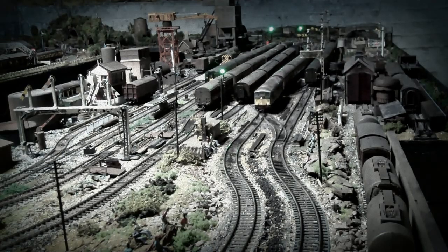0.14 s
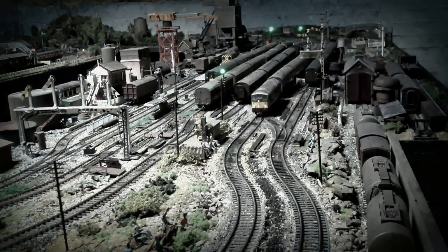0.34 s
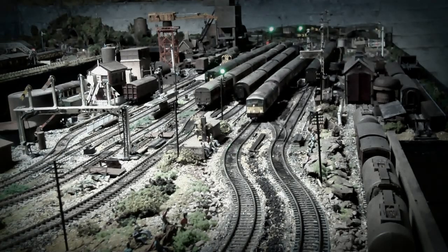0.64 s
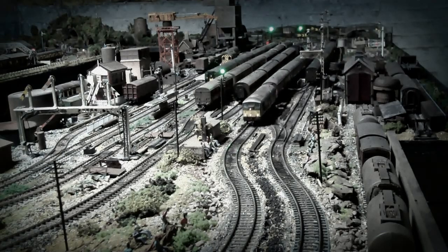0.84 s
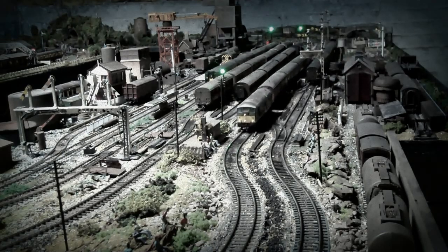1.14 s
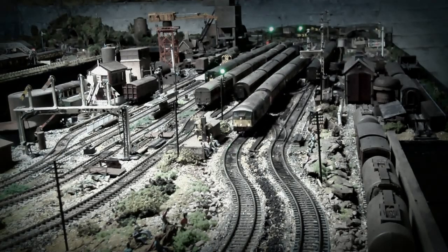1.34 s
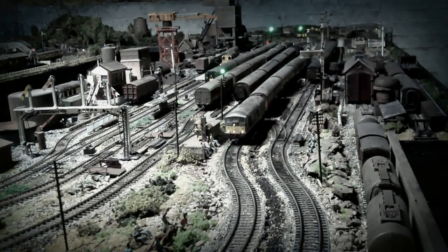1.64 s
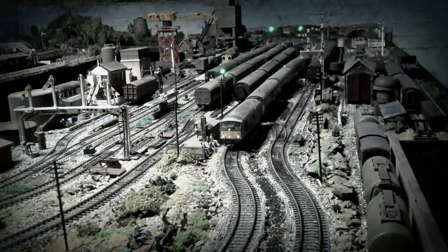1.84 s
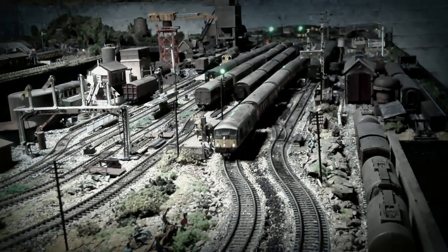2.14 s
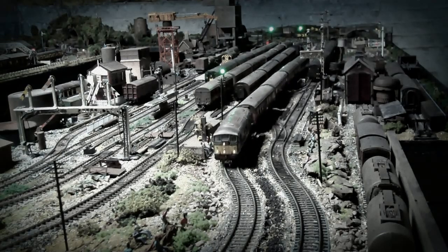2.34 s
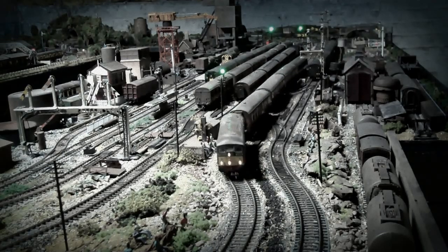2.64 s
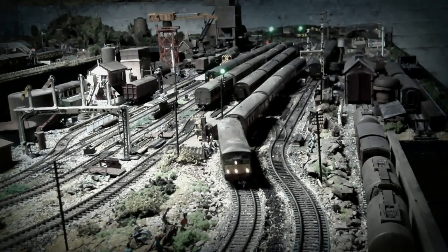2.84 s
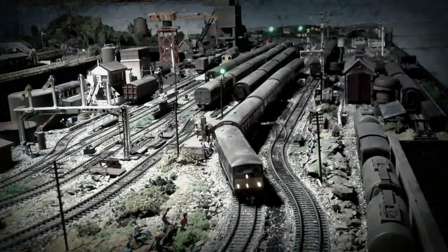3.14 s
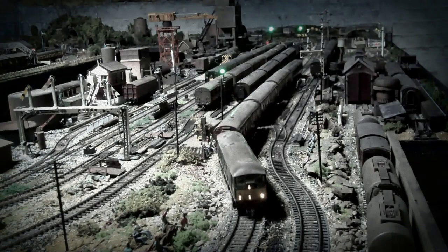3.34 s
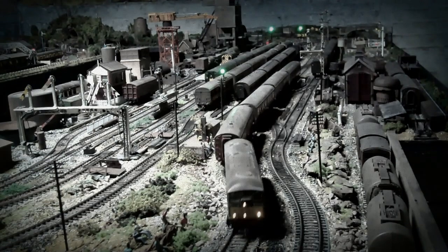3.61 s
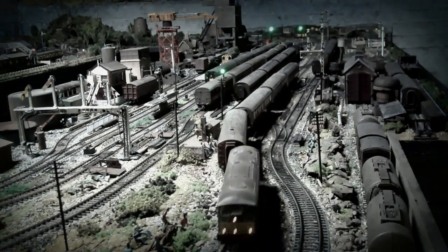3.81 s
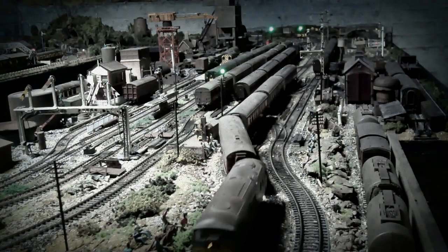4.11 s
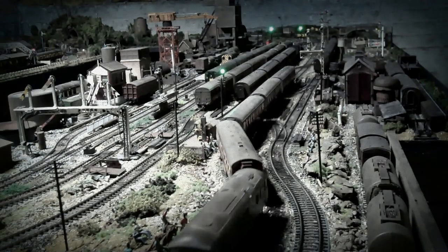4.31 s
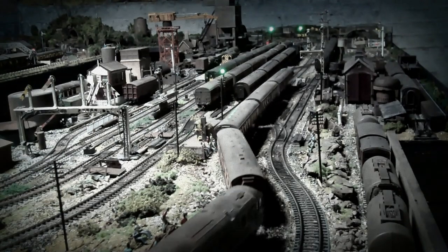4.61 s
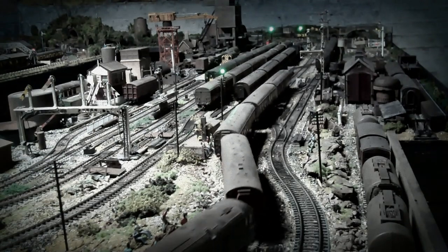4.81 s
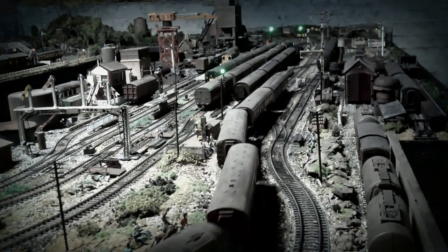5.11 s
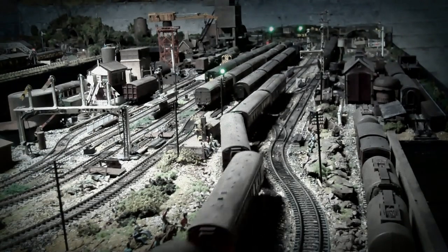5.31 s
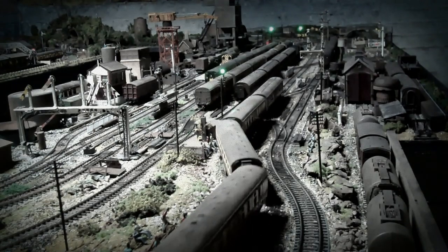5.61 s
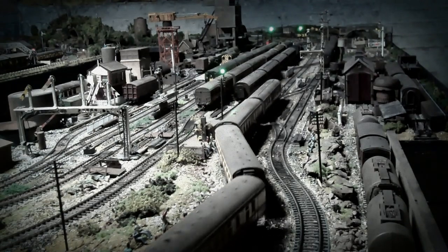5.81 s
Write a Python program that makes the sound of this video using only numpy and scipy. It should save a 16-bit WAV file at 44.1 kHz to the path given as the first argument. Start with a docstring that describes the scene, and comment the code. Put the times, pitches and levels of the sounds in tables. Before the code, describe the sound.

Bright plastic clatter of a miniature locomotive and coaches builds fast, passes close with a thin gear whine, and rattles on in a small room.

```python
"""On a model railway layout in a small room, a locomotive hauls coaches over points and an S-bend, up to and past the ear.
The drive rattles six times a wheel turn, about 25 a second: noise flurries ring the plastic shell and the bogies.
Some rattles jolt, adding a hard tick, a knock and a clink. Coloured noise makes the wheels hiss, scrape and drum;
flanges squeak as brief tones, and in the tight curve the gears whine in harmonics. Faint hum lies behind."""
import sys
import numpy as np
from scipy import signal
from scipy.fft import rfft, irfft, next_fast_len
from scipy.io import wavfile
from scipy.ndimage import map_coordinates

SR = 44100
rng = np.random.default_rng(int(sys.argv[2]) if len(sys.argv) > 2 else 0)


def transcribe(u):
    """Save the signal u as a 16-bit wav file named by the first command-line argument.

    u: samples, shape (n,) or (channels, n), limited to [-1, 1]; the rate is SR.
    q: integer samples, one column per channel.
    """
    v = np.clip(np.atleast_2d(u).T, -1, 1)
    q = np.round(v * 32767).astype(np.int16)
    wavfile.write(sys.argv[1], SR, q)


N = 262836

# Train's place. Each row: time in seconds, place (0 head-on, 1 passing, 2 gone by).
PASSING = [(0, 0.085), (1.2, 0.26), (2, 0.17), (2.8, 0.22), (3.5, 0.57), (4.3, 0.88), (4.9, 1.12),
           (5.3, 1.13), (5.55, 1.72), (5.96, 1.65)]
# Driving wheels. Each row: time in seconds, speed in turns per second.
SPEED = [(0, 2.7486), (1.2, 3.6216), (2.2, 4.0748), (3.2, 4.1801), (3.9, 4.3076), (4.5, 4.1395),
         (5.3, 4.3084), (5.96, 4.1074)]
# Force of the drive's rattle. Each row: time in seconds, level in dB, brightness (bogies over shell) in dB.
EFFORT = [(0, -41.5, 7), (.36, -29, -1.5), (.56, -23, 0.5), (.95, -20, -1), (1.4, -19, 0.5),
          (2.2, -20, -1.5), (3, -21.5, -3), (3.6, -19, -5), (4.5, -21.5, -3), (5.25, -21, 2),
          (5.96, -24, 1)]
# Shell modes. Each row: frequency in Hz, width in Hz before squaring, relative dB head-on, passing, gone by.
SHELL = [(1039, 264, -23.5, -9.5, -9), (1535, 760, -12, -16, -16), (1949, 163, -3.5, 5.5, -12.5),
         (2104, 133, -4.5, -9, -11), (2387, 273, -6.5, -8, -8.5), (3176, 370, -1, -15.5, -24),
         (3385, 320, -29, -8.5, -2.5)]
# Hard rattles. Each row: onset in seconds, bogie reference in dB, knock in Hz, knock reference in dB.
JOLTS = [(0.6, -19, 2300, -23), (0.704, -16, 2370, -21), (0.7517, -9, 1980, -19),
         (0.851, -14.5, 1950, -16.5), (0.9514, -14.5, 2370, -16), (1.0415, -8, 1960, -17),
         (1.229, -11.5, 2000, -25), (1.3184, -8, 1910, -16), (1.4087, -14.5, 1900, -15),
         (1.499, -9.5, 1950, -22), (1.587, -10.5, 1870, -18.5), (1.674, -14.5, 1890, -17),
         (1.76, -12.5, 2060, -19.5), (1.8472, -8, 2120, -16.5), (1.932, -13.5, 1950, -17),
         (2.097, -8, 2580, -19), (2.18, -13, 1860, -19.5), (2.229, -12.5, 2070, -19.5),
         (2.264, -13.5, 2000, -21), (2.3437, -10, 2200, -18.5), (2.47, -15, 2000, -21),
         (2.5884, -11, 1960, -19), (2.752, -13.5, 1900, -20.5), (2.828, -10, 1860, -18),
         (2.9124, -14.5, 2090, -17), (2.9553, -17, 2080, -16.5), (3.0694, -14.5, 1970, -14),
         (3.309, -14, 1960, -16), (3.3914, -16, 1940, -15.5), (3.47, -22, 1920, -19),
         (3.5497, -16.5, 1940, -17), (3.866, -14, 1950, -19.5), (4.014, -15, 1930, -17),
         (4.177, -15.5, 1930, -16), (4.332, -13.5, 1950, -16), (4.377, -18, 1930, -17),
         (4.566, -13, 1890, -15.5), (4.612, -14.5, 1920, -14), (4.648, -18.5, 1930, -21),
         (4.7234, -16, 1960, -17), (4.806, -14, 1950, -16), (4.854, -13, 1940, -19),
         (4.887, -11.5, 1950, -27), (5.046, -11.5, 1950, -17.5), (5.125, -13, 1940, -21),
         (5.165, -13.5, 1950, -16), (5.2797, -11.5, 1920, -16.5), (5.326, -10.5, 1920, -16.5),
         (5.433, -8, 1950, -19.5), (5.559, -10.5, 2400, -20.5), (5.672, -10, 2400, -22.5)]
JOLT_PEAK_S = 0.004  # from onset to tick


def amp(db):
    """Decibels to gain."""
    return 10 ** (np.asarray(db) / 20)


def unit(x):
    """Scale to rms 1."""
    return x / np.sqrt(np.mean(x ** 2) + 1e-20)


def along(points, hz):
    """Interpolate (Hz, value) points on a log frequency axis."""
    f, v = np.transpose(points)
    return np.interp(np.log(hz + 1), np.log(f + 1), v)


def curves(rows):
    """One value per sample for each column after the time."""
    s, *cols = np.transpose(rows)
    return [np.interp(np.arange(N) / SR, s, c) for c in cols]


def by_place(levels_db):
    """A level in dB that follows the train from head-on over passing to gone by."""
    return np.interp(curves(PASSING)[0], np.arange(3), levels_db)


def wobble(knots_per_s):
    """A smooth random curve through normal draws."""
    knots = rng.standard_normal(int(N * knots_per_s / SR) + 4)
    return map_coordinates(knots, [np.arange(N) * knots_per_s / SR])


def filtered(x, response):
    """Filter x by a complex response of frequency."""
    m = next_fast_len(N + SR // 2)
    return irfft(rfft(x, m) * response(np.fft.rfftfreq(m, 1 / SR)), m)[..., :N]


def resonance(f, hz, width_hz):
    """Complex response of one damped mode, 1 at its peak."""
    return 1j * f * width_hz / (hz * hz - f * f + 1j * f * width_hz)


def spread(x):
    """Mix two unrelated signals into a stereo pair whose likeness depends on frequency."""
    # Each row: frequency in Hz, left-right correlation.
    alike = [(40, 0.48), (160, 0.91), (700, 0.91), (2000, 0.88), (3200, 0.72), (5300, 0.38), (8800, 0.29),
             (14000, 0)]

    def mid_side(hz):
        angle = np.arccos(np.clip(along(alike, hz), -1, 1)) / 2
        return np.array([np.cos(angle), np.sin(angle)])

    mid, side = filtered(x, mid_side)
    return np.array([mid + side, mid - side])


def contacts(spiky_db):
    """Stereo noise of tiny impacts, uneven in size from one 16-sample step to the next, rms 1."""
    step_db = spiky_db * rng.standard_normal(N // 16 + 1)
    sizes = amp(np.repeat(step_db, 16)[:N])
    return unit(spread(sizes * rng.standard_normal((2, N))))


def rush(spectrum, spiky_db):
    """Dense contacts with a broad colour, rms 1."""
    return unit(filtered(contacts(spiky_db), lambda hz: amp(along(spectrum, hz))))


def ring(force, modes, vary_db, wander):
    """Modes ring at constant overall power; balance follows place, balance and pitch also drift at random."""
    m = next_fast_len(N + SR // 8)
    f, spectrum = np.fft.rfftfreq(m, 1 / SR), rfft(force, m)
    sound, power = 0, 0
    for hz, width_hz, *views_db in modes:
        response = resonance(f, hz, width_hz) ** 2
        gain = amp(by_place(views_db) + vary_db * wobble(25))
        drift = np.exp(2j * np.pi * np.cumsum(hz * wander * wobble(25)) / SR)
        # one-sided spectrum gives a complex signal whose pitch can be shifted
        analytic = np.fft.ifft(spectrum * response, m)[:, :N]
        sound = sound + 2 * gain * (analytic * drift).real
        power = power + gain ** 2 * np.mean(np.abs(response) ** 2)
    return sound / np.sqrt(power)


def flurries(times_s, levels_db, rises_s, fall_s, early_s):
    """Force envelope: each flurry swells exponentially, peaks early_s before its time and dies away."""
    power = np.zeros(N)
    for s, db, rise_s in zip(times_s, levels_db, rises_s):
        span = np.arange(max(0, int(s * SR) - SR // 16), min(N, int(s * SR) + SR // 10))
        t = span / SR - s + early_s
        swell = np.exp(np.minimum(t / rise_s, -t / fall_s))
        power[span] += (amp(db) * swell) ** 2
    return np.sqrt(power)


def rattles():
    """Time, shell dB, bogie dB and rise of each rattle: one pattern per wheel turn, with some set as jolts."""
    # Each row: share of the turn, dB head-on, dB passing, brightness in dB, rise in seconds at mean speed.
    pattern = [(0, -0.5, -2, 4, 0.005), (.19, -4, -3, 1.5, 0.0057), (0.343, -1, 0.5, 2.5, 0.0068),
               (0.528, -2, -2, 1, 0.0054), (.682, -3, -1.5, 2.5, 0.0034), (0.857, -5.5, -2, 2.5, 0.0078)]
    first_turn_s, rise_speed_power, uneven_db = 0.099, 2.2, 0.6
    t = np.arange(N) / SR
    speed = curves(SPEED)[0]
    softness = (speed.mean() / speed) ** rise_speed_power  # slow wheels swell more gently
    turns = np.cumsum(speed) / SR
    turns -= np.interp(first_turn_s, t, turns)
    effort_db, bright_db = curves(EFFORT)
    place = curves(PASSING)[0]
    rows = []
    for share, head_on_db, passing_db, bright, rise_s in pattern:
        for i in np.searchsorted(turns, np.arange(share, turns[-1])):
            db = effort_db[i] + np.interp(place[i], [0, 1], [head_on_db, passing_db])
            rows.append((t[i], db, bright_db[i] + bright, rise_s * softness[i]))
    times_s, db, bright, rises_s = np.transpose(sorted(rows))
    shell_db = db + uneven_db * rng.standard_normal(len(times_s))
    bogie_db = shell_db + bright
    for s, clash_db, _, knock_db in JOLTS:
        k = np.argmin(np.abs(times_s - s))
        times_s[k], rises_s[k] = s + JOLT_PEAK_S, 0.0028
        shell_db[k], bogie_db[k] = knock_db - 4, clash_db - 6.5
    return times_s, shell_db, bogie_db, rises_s


def drive():
    """Slack taken up in the drive shakes bogies and shell with flurries of impacts; a jolt adds one hard tick."""
    # Bogie frame modes. Each row: frequency in Hz, width in Hz before squaring, relative dB head-on, passing, gone by.
    bogie = [(4619, 600, -12, -5, -2), (5045, 240, -6.5, -15, -27), (5650, 450, -2, -9.5, -22),
             (6683, 460, -4, -11.5, -17.5), (7390, 720, -21, -17, -16.5), (8610, 1730, -20, -26.5, -19)]
    times_s, shell_db, bogie_db, rises_s = rattles()
    jolt_s, jolt_db = np.transpose(JOLTS)[:2]
    tick_rises_s = np.full(len(JOLTS), 0.0005)
    ticks = flurries(jolt_s + JOLT_PEAK_S, jolt_db, tick_rises_s, fall_s=0.0016, early_s=0)
    ticks = amp(by_place((-2.5, -5.5, -7))) * ticks * contacts(spiky_db=-0.5)
    shell_force = flurries(times_s, shell_db, rises_s, fall_s=0.016, early_s=0.0026) * contacts(spiky_db=2.0)
    shell_force = shell_force + amp(-6.5) * ticks
    bogie_force = flurries(times_s, bogie_db, rises_s, fall_s=0.0105, early_s=0.0029) * contacts(spiky_db=2.5)
    bogie_force = bogie_force + ticks
    shell_sound = ring(shell_force, SHELL, vary_db=2.1, wander=0.012)
    return shell_sound + ring(bogie_force, bogie, vary_db=1.5, wander=0.008)


def rails():
    """Narrow track resonances kept ringing by the rolling wheels, rms 1."""
    # Each row: frequency in Hz, width in Hz, relative level in dB, all before the magnitude is squared.
    modes = [(4180, 56, -2.5), (5185, 200, -4.5), (6093, 140, -4), (7280, 150, -6.5)]

    def response(f):
        total = sum(amp(db) * resonance(f, hz, width_hz) for hz, width_hz, db in modes)
        return total * np.abs(total)

    return unit(filtered(contacts(spiky_db=3.5), response))


def scenery(x, echo_db, reach_s=0.024, count=12):
    """Model buildings and the backdrop throw back weak early copies that comb the spectrum."""
    taps = np.zeros(SR // 16)
    delays = np.minimum((rng.uniform(0.15, 1, count) * reach_s * SR).astype(int), len(taps) - 1)
    taps[delays] = amp(echo_db) / np.sqrt(count) * rng.choice([-1, 1], count)
    taps[0] = 1
    return signal.fftconvolve(x, taps[None] / np.linalg.norm(taps), axes=1)[:, :N]


def wheels():
    """Rolling drums the baseboard, buzzes the shell, hisses and scrapes; a fine fizz is strongest once gone by."""
    # Noise colours. Each row: frequency in Hz, relative level in dB per Hz.
    board_colour = [(25, -42), (45, -48), (115, -21), (200, -22), (290, -19), (400, -17), (500, -11.5),
                    (660, -9), (800, 0), (1020, 0.5), (1180, -1), (1400, 1.5), (1750, -2), (2450, -7),
                    (2800, -9.5), (4000, -25)]
    boom_colour = [(60, -40), (100, -3), (135, -20), (170, 6.5), (215, 4), (260, -1.5), (500, -23)]
    hiss_colour = [(1500, -21), (2750, -8.5), (3300, 0), (3850, -8), (4400, -1), (5050, 6), (5450, -0.5),
                   (6050, 0.5), (6900, -8), (8300, -14), (9800, -17.5), (11000, -29), (11800, -55),
                   (14400, -46)]
    scrape_colour = [(900, -33), (1500, -28), (2000, -22), (2330, 3), (2750, -20), (3250, -4.5), (3800, -1),
                     (4400, 3), (5200, 4.5), (6500, -4), (8000, -22), (11500, -56)]
    fizz_colour = [(7000, -12), (9000, 2), (11000, -4), (12000, -1), (13700, 8), (14400, -14)]
    # Table boom as the train's weight comes onto it. Each row: time in seconds, level in dB.
    weight = [(0, -74), (1, -66), (2, -57.5), (4.1, -54), (5.96, -59)]
    # Scraping through the points. Each row: time in seconds, level in dB before a -2.2 dB trim.
    points = [(0, -27), (.4, -23.5), (.82, -26.5), (1.0, -20.5), (1.2, -21), (1.4, -26), (2.2, -61)]
    bumps = wobble(30)
    speed = curves(SPEED)[0]
    speed_db = 1.0 * (speed - speed.mean())  # 1 dB per turn per second
    board_db = by_place((-32.5, -30, -31.5)) + speed_db + 0.24 * bumps
    board = amp(board_db) * rush(board_colour, spiky_db=0.5)
    boom = amp(curves(weight)[0] + 0.67 * wobble(16)) * rush(boom_colour, spiky_db=-1.0)
    buzz_db = curves(EFFORT)[0] - 12.5 + 1.3 * wobble(60)
    buzz = ring(amp(buzz_db) * contacts(spiky_db=3.0), SHELL, vary_db=2.5, wander=0.014)
    hiss = rush(hiss_colour, spiky_db=1.0) + amp(-8.0) * rails()
    hiss = amp(by_place((-31, -29, -29)) + 1.1 * bumps) * hiss
    scrape = amp(curves(points)[0] - 2.2 + 1.2 * wobble(39.3)) * rush(scrape_colour, spiky_db=4.0)
    fizz = amp(by_place((-65, -46, -40)) + 1.2 * bumps) * rush(fizz_colour, spiky_db=7.0)
    return boom + scenery(board, echo_db=-9.5) + scenery(buzz + hiss + scrape + fizz, echo_db=-4)


def hum():
    """Faint electrical hum: sines with slightly unsteady phase."""
    # Each row: frequency in Hz, rms level in dB.
    tones = [(60.5, -90), (214, -67), (365, -62)]
    t = np.arange(N) / SR
    return np.sqrt(2) * sum(amp(db) * np.sin(2 * np.pi * hz * t + 0.28 * wobble(4.6)) for hz, db in tones)


def flanges():
    """A flange catches the rail and sings for a moment with a ragged, fluttering tone."""
    # Each row: centre in seconds, length in seconds (two standard deviations), frequency in Hz, level in dB.
    squeaks = [(0.114, 0.11, 1962, -29), (0.165, 0.061, 4620, -37), (1.123, 0.018, 3300, -31),
               (2.84, 0.045, 1033, -36.5), (3, 0.026, 2560, -30), (5.537, 0.018, 4340, -28)]
    t = np.arange(N) / SR
    ragged_rad, flutter = 0.9 * wobble(120), unit(amp(4 * wobble(130)))
    tones = np.zeros(N)
    for s, length_s, hz, db in squeaks:
        swell = np.exp(-2 * ((t - s) / length_s) ** 2)
        tones += amp(db) * swell * np.sin(2 * np.pi * hz * t + ragged_rad)
    return np.sqrt(2) * flutter * tones


def knocks():
    """Each jolt makes one part of the shell ring briefly at its own ragged pitch; the chassis clinks above it."""
    gain_db, rise_s, t60_s, scatter_rad = 2.2, 0.0012, 0.075, 0.8
    out, t = np.zeros(N), np.arange(SR // 8) / SR
    ragged, ragged_clink = scatter_rad * wobble(240), 2 * scatter_rad * wobble(240)
    shape = (1 - np.exp(-t / rise_s)) * amp(-60 * t / t60_s)
    clink_db = by_place((-5, -20, -10))  # against the knock
    clink_hz = 3200 * (1 + 0.025 * wobble(25))
    for s, _, hz, db in JOLTS:
        i = int(s * SR)
        span = i + np.arange(len(t))
        knock = np.sin(2 * np.pi * hz * t + ragged[span])
        clink = amp(clink_db[i]) * np.sin(2 * np.pi * clink_hz[i] * t + ragged_clink[span])
        out[span] += amp(db + gain_db) * shape * (knock + clink)
    return out


def gears():
    """Loaded by the curve, the gear mesh wavers up in pitch, settles, and its harmonics flutter, swell and fade."""
    # Each row: multiple of the mesh frequency, rms level in dB, start and end of full level in seconds.
    partials = [(1, -39.5, 3.0, 3.62), (1, -42, 3.75, 3.85), (1, -44, 4.12, 4.36), (2, -32.5, 3.58, 3.8),
                (2, -31.5, 3.97, 4.34), (3, -38, 3.56, 3.64), (3, -34, 3.8, 3.89), (3, -32.5, 4.06, 4.17),
                (4, -37, 3.6, 3.75), (4, -42, 4.0, 4.32), (5, -33.5, 3.48, 3.61), (5, -41, 3.83, 3.92),
                (5, -33.5, 4.05, 4.13), (6, -36.5, 3.72, 3.82), (6, -36, 4.01, 4.13)]
    low_hz, mesh_top_hz, waver_hz = 733, 858.5, 6.4
    glide_start_s, glide_s = 2.95, 0.47
    rise_db_per_s, fall_db_per_s = 150, 120
    t = np.arange(N) / SR
    glide = np.sin(np.pi / 2 * np.clip((t - glide_start_s) / glide_s, 0, 1)) ** 2
    mesh_hz = low_hz + (mesh_top_hz - low_hz) * glide + waver_hz * (1 - glide) * wobble(30)
    phase = 2 * np.pi * np.cumsum(mesh_hz * (1 + 0.0005 * wobble(50))) / SR
    whine = 0
    for k, db, start_s, end_s in partials:
        fade_db = rise_db_per_s * np.maximum(start_s - t, 0) + fall_db_per_s * np.maximum(t - end_s, 0)
        flutter = unit(amp(1.2 * wobble(40)))
        whine = whine + amp(db - fade_db) * flutter * np.sin(k * phase + 0.1 * wobble(70))
    return np.sqrt(2) * whine


def room(x):
    """The walls answer after 5 ms with a short noise tail whose decay depends on frequency."""
    # Each row: frequency in Hz, 60 dB decay time in seconds.
    decay = [(200, 0.2), (2000, 0.064), (10000, 0.079)]
    hz, t, z = signal.stft(rng.standard_normal((2, SR // 2)), SR, nperseg=256)
    fading = z * amp(-60 * t / along(decay, hz)[:, None])
    noise = signal.istft(fading, SR, nperseg=256)[1]
    tail = spread(noise)[:, :SR // 2]
    tail = np.pad(tail / np.linalg.norm(tail[0]), ((0, 0), (SR // 200, 0)))
    return signal.fftconvolve(x, tail, axes=1)[:, :N]


def scene():
    """The train on its layout; the room answers the clatter."""
    clatter = drive() + knocks() + flanges()
    return clatter + gears() + amp(-2.5) * room(clatter) + wheels() + hum()


def record(dry):
    """The microphone dulls the top treble, its right port more than the left; a hard band limit ends it."""
    # Each row: frequency in Hz, left minus right in dB.
    balance = [(100, 0.5), (1500, -0.6), (3500, -0.7), (4100, -1.5), (5400, -5.5), (6200, -4), (7150, 13.5),
               (8200, 17.5), (9500, 11), (14000, 7.5)]
    # Each row: frequency in Hz, gain in dB.
    treble = [(7000, -1), (7900, -4), (8900, -8), (9700, -10.5), (11100, -5), (11800, -19.5), (14400, -15)]
    top_hz = 14430

    def response(hz):
        ratio = amp(along(balance, hz))
        ports = np.array([ratio, np.ones_like(ratio)]) * np.sqrt(2 / (1 + ratio ** 2))
        return ports * amp(along(treble, hz)) * (hz < top_hz)

    return filtered(dry, response)


dry = scene()
out = record(dry)
transcribe(out)
```